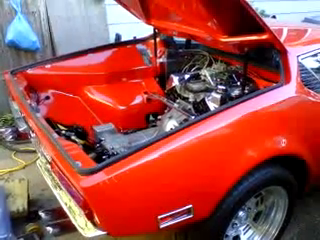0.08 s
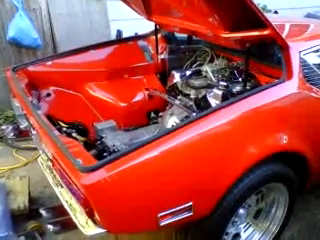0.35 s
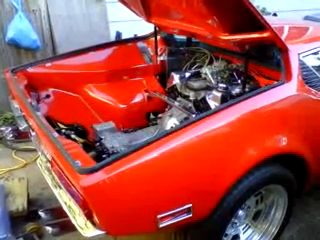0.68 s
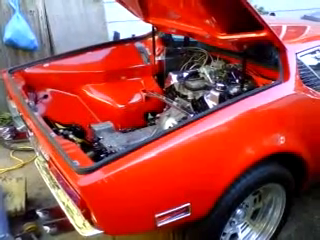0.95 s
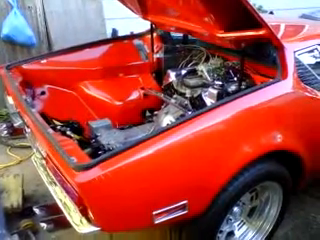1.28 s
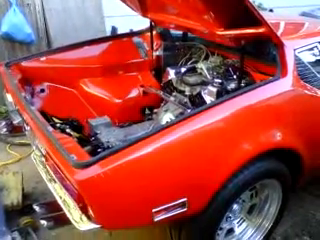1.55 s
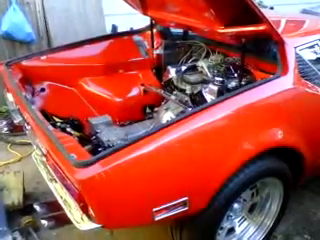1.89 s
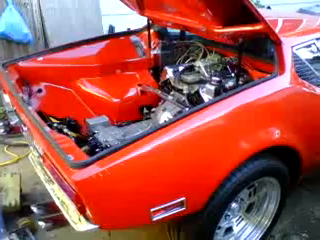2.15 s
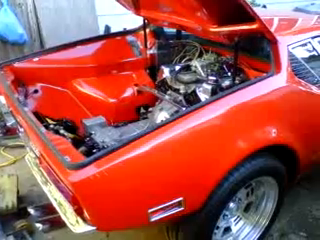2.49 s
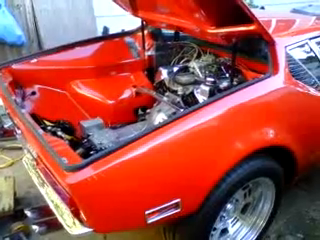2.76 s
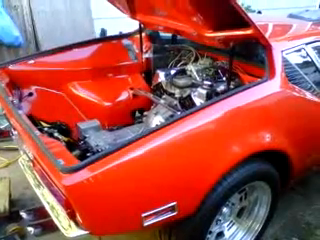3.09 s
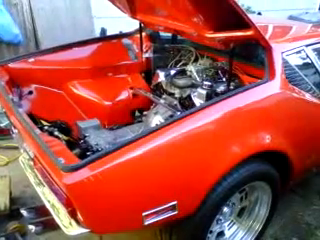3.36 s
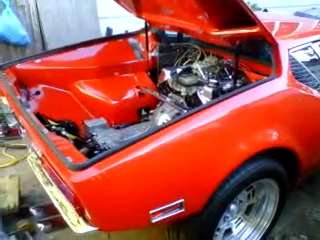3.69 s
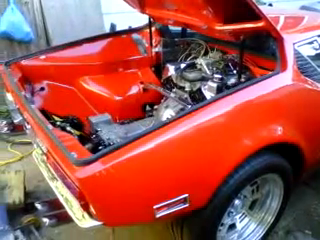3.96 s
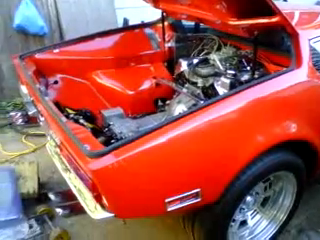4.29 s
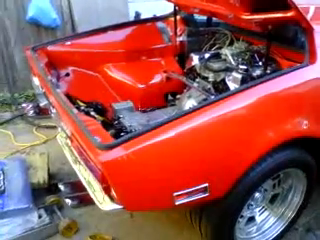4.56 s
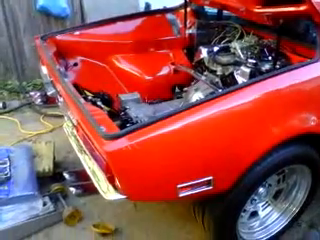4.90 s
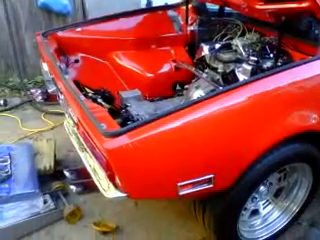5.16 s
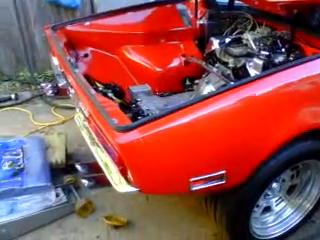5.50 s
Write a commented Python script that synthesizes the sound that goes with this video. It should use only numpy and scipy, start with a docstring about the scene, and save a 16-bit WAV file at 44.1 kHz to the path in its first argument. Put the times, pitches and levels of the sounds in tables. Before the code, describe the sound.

A low outdoor rumble swells and fades, with a few faint rubs. A little past halfway, a sports car's starter engages with a clack and grinds briefly with a dipping whine. The big engine catches, flares once and settles into a loud, loping idle. The microphone is close to the open engine bay and overloads on the deep exhaust.

```python
"""V8 cold-open start in a yard

A sports car, bonnet open, close to a small microphone. Over a low outdoor rumble the solenoid slams the pinion
in and the starter gears grind through three compressions. The engine catches, flares and settles to a loping
idle: each firing sends a thump and a bark down the exhaust, one bank lagging the other. The exhaust overloads
the microphone."""
import sys
import numpy as np
from scipy import signal
from scipy.fft import rfft, irfft, next_fast_len
from scipy.io import wavfile

SR = 44100
rng = np.random.default_rng(int(sys.argv[2]) if len(sys.argv) > 2 else 0)


def to_wav(s):
    """Save 16-bit WAV."""
    ch = np.atleast_2d(s).T  # columns
    pcm = np.round(np.clip(ch, -1, 1) * 32767)  # PCM
    wavfile.write(sys.argv[1], SR, pcm.astype(np.int16))


N = 248283
TIME_S = np.arange(N) / SR

# Cylinders in firing order: bank (0 near, 1 far), thump/dB, bark/dB
CYLINDERS = [(0, -0.5, 6), (0, -3.5, 5), (1, 0, -3), (0, 0, 4.5), (1, 0, -6), (1, -1.3, -4), (0, 0, 3.5),
             (1, -2, -2.5)]
# Exhaust response to the thumps: f/Hz, level/dB
THUMP_SPECTRUM = [(15, -29.5), (35, -3.5), (62, 2.5), (92, 2), (130, 7.5), (200, -6), (350, -3.5),
                  (700, -46.5)]
# Exhaust response to the barks: f/Hz, level/dB
BARK_SPECTRUM = [(70, -5.5), (125, 11), (180, 7), (260, 4), (365, -1), (480, -6.5), (660, -12),
                 (900, -27.5), (1400, -18.5), (2500, -36), (7000, -52.5)]
# Exhaust pipe resonances: f/Hz, bandwidth/Hz, level/dB
PIPE_MODES = [(361, 24, 3), (474, 24.4, 2.5), (638, 73, 0.5), (869, 50, -15)]
# Bark dips and surges in catch and flare: t/s, gain/dB, half-width/s
BARK_SURGES = [(4.009, -7, 0.023), (4.057, -7, 0.011), (4.105, 3.5, 0.053), (4.224, 3, 0.024),
               (4.42, 4, 0.027)]
# Intake air and valve gear: f/Hz, level/dB
BAY_SPECTRUM = [(700, -34), (1600, 14), (2800, 9.5), (3700, -11), (4700, 8), (6000, -0.5), (7300, -25)]
# Compressions dragging the starter: t/s, share of speed lost
COMPRESSIONS = [(3.447, .23), (3.675, 0.32), (3.915, 0.2)]
# Starter whine: multiple of pinion rate, level/dB, gain under strain/dB
GEAR_TONES = [(8, -13.5, 4), (9, -7.5, 2), (10, -17, 6), (17, -17.5, -1.5), (18, -12.5, 12)]
# Bell housing response: f/Hz, level/dB
HOUSING_SPECTRUM = [(71, -58.5), (120, -16.5), (208, -5.5), (288, -14.5), (451, -7), (526, -10.5), (837, 1),
                    (1400, -6.5), (1750, -3), (3200, -6.5), (3930, -16), (5840, -16), (7300, -39),
                    (9490, -74), (16100, -120)]
# Bell housing resonances: f/Hz, bandwidth/Hz, level/dB
HOUSING_MODES = [(464, 29, -6.5), (869, 14, -7.5), (986, 21, -7), (1290, 15, -0.5), (1730, 91, -5.5),
                 (1734, 44, -3), (2170, 40, 0.5), (2380, 30, -8), (2716, 77, -6), (3134, 37, -10)]
# Solenoid and pinion blows: t/s, level/dB, T60/s
BLOWS = [(3.333, -29.5, 0.12), (3.353, -14.5, 0.065), (3.377, -22.5, 0.06)]
# Clack of a blow: f/Hz, level/dB
CLACK_SPECTRUM = [(100, -22), (220, -1), (470, -16), (680, -11.5), (1280, 1), (1700, -3.5), (2150, -1),
                  (2900, 5.5), (3550, -7.5), (6500, -15), (7400, -33.5)]
# Free-spinning starter: f/Hz, level/dB
FREEWHEEL_SPECTRUM = [(700, -15), (1600, 4.5), (2800, 3.5), (3700, -7), (4700, 0), (6000, -1),
                      (7300, -15.5)]
# Pinion leaving the flywheel: t/s, level/dB, half-width/s
RASPS = [(4.48, -27.5, 0.052), (4.545, -32.5, 0.0061)]
# Air puffs while cranking: t/s, level/dB, half-width/s
CHUFFS = [(3.397, -31, .018), (3.47, -31.5, 0.063), (3.623, -28, .02)]
# Air puff: f/Hz, level/dB
CHUFF_SPECTRUM = [(35, -2), (90, -11), (140, -7.5), (215, 0.5), (300, -6), (440, 4), (700, -36.5)]
# Soft rubs: t/s, level/dB, half-width/s, f/Hz, glide/(Hz/s), bandwidth/Hz
SCUFFS = [(0.034, -47, 0.029, 943, 0, 262), (0.356, -48.5, 0.037, 925, 6002, 200),
          (0.358, -44.5, 0.053, 458, -1, 160), (0.499, -48, 0.091, 607, -3000, 480),
          (1.108, -53.5, 0.042, 1093, -7, 636), (1.493, -59.5, 0.064, 1320, 0, 264)]
# Outdoor swells: peak t/s, rumble/dB, rush/dB, time constant/s
SWELLS = [(0.022, -48.5, -49, 0.24), (0.28, -45.5, -49, 0.24), (0.799, -40.5, -58, 0.49),
          (1.173, -28.5, -51, 0.17), (1.541, -38.5, -53.5, 0.18), (3.4, -40, -46.5, 0.87)]
# Low outdoor rumble: f/Hz, level/dB
RUMBLE_SPECTRUM = [(24, -40), (40, -3), (91, -7), (172, 0.5), (309, -9.5), (362, -4.5), (440, -9),
                   (475, -15.5), (650, -16), (694, -25.5), (900, -50), (1170, -68), (1980, -120)]
# Midrange rush: f/Hz, level/dB
RUSH_SPECTRUM = [(250, -25.5), (420, 9.5), (620, 6), (780, -3), (950, 1.5), (1130, -0.5), (1380, -2),
                 (1650, -7.5), (2000, -38.5)]
# High hiss: f/Hz, level/dB
HISS_SPECTRUM = [(1100, -2), (1700, -6), (2300, -2.5), (2900, -6), (3500, -22), (4300, -17), (7000, -26.5)]
# Steady noise floor: f/Hz, level/dB
FLOOR_SPECTRUM = [(15, -11.5), (50, -1), (90, -5.5), (250, -15), (900, -27.5), (2500, -40.5), (7000, -48.5)]


def engine(bark_db=-3.5, pipe_db=-4, bay_db=-34, flicker_db=6, clatter=0.47, bark_slope=2.14):
    """Firing pulses boom and rasp through the exhaust; intake and valve gear clatter in step."""
    firing_hz, effort_db = combustion()
    thumps, barks, puffs = cylinder_pulses(firing_hz)
    running = TIME_S > 4
    thumps = coloured(thumps, THUMP_SPECTRUM)
    boom = amp(effort_db) * thumps / thumps[running].std()
    barks = unit_rms(coloured(barks, BARK_SPECTRUM)) + amp(pipe_db) * ring(barks, PIPE_MODES)
    surge_db = sum(db * hump(at_s, width_s) for at_s, db, width_s in BARK_SURGES)
    rasp_db = bark_db + bark_slope * effort_db + surge_db  # harder firing is brighter
    rasp = amp(rasp_db) * barks / barks[running].std()
    beat = 1 + clatter * (np.sqrt(puffs / puffs[running].mean()) - 1)
    bay = amp(bay_db + flicker_db * wander(48)) * beat * noise(BAY_SPECTRUM)
    return (boom + rasp + bay) * gate(3.9, np.inf, 0.012)


def combustion(first_hz=38.27, idle_hz=66.04, flare_hz=13, hunt_hz=0.96, hunt_period_s=1.1,
               catch_s=3.996, catch_db_per_s=636):
    """Firing rate/Hz and effort/dB: catch, quick run-up, one flare, gently hunting idle."""
    dip_hz = hunt_hz * np.cos(2 * np.pi * (TIME_S - 5.02) / hunt_period_s)
    running_hz = idle_hz - dip_hz + flare_hz * hump(4.3, 0.2)
    firing_hz = first_hz + (running_hz - first_hz) * step(4.06, 0.015)
    running_db = -3 + 4.5 * hump(4.1, 0.23)
    return firing_hz, running_db - catch_db_per_s * np.clip(catch_s - TIME_S, 0, 0.5)


def cylinder_pulses(firing_hz, cycle_start_s=5.0505, spread_db=0.5, turbulence=0.81,
                    lag_firings=0.25, stumble_firings=0.022, rise_firings=0.29, decay_firings=0.7):
    """Thumps, barks and bark envelope of all firings; the far bank's lag makes the lope."""
    firings = np.cumsum(firing_hz) / SR
    firings -= np.interp(cycle_start_s, TIME_S, firings)
    voices = rng.standard_normal((len(CYLINDERS), SR // 10))  # each port repeats its own bark
    lope = 1 + 0.36 * hump(4.64, 0.13)  # deepens as the speed falls back
    thumps, barks, puffs = np.zeros((3, N))
    for k in range(int(np.interp(3.93, TIME_S, firings)), int(firings[-1]) + 2):
        cylinder = k % len(CYLINDERS)
        bank, thump_db, bark_db = CYLINDERS[cylinder]
        span = slice(*np.searchsorted(firings, [k - 1, k + 3]))
        lag = lag_firings * (bank - 0.5) * lope[span]
        age = firings[span] - k - lag - stumble_firings * rng.standard_normal()
        chance_db = spread_db * rng.standard_normal()
        swirl = turbulence * rng.standard_normal(SR // 10)
        window = np.cos(np.pi / 2 * np.clip(age - 0.5, -1, 1)) ** 2
        thumps[span] += amp(thump_db + chance_db) * window * np.cos(2 * np.pi * age)
        attack = np.clip((age - 0.1) / rise_firings, 0, 1)
        puff = amp(bark_db + chance_db) * attack * np.exp(-abs(age) / decay_firings)
        barks[span] += puff * np.resize(voices[cylinder] + swirl, len(age))
        puffs[span] += puff
    return thumps, barks, puffs


def starter(scrape_db=-1, buzz_db=-6, ring_db=-4, rough_db=1, flutter_db=3, bite=0.54, jitter=0.012,
            pinion_teeth=9, strain_lead_s=0.062):
    """Gear teeth scrape, buzz and whine in the bell housing, straining into a compression."""
    mesh_hz, gears_db = cranking()
    teeth = np.cumsum(mesh_hz * (1 + jitter * wander(92))) / SR
    pinion_rad = 2 * np.pi * teeth / pinion_teeth
    force = unit_rms(amp(rough_db * rng.standard_normal(N)[teeth.astype(int)]))  # one draw per tooth
    scrape = force * (1 + bite * np.cos(2 * np.pi * teeth)) * rng.standard_normal(N)
    wear = sum(np.sin(order * pinion_rad + 2 * np.pi * rng.random()) for order in range(5, 37))
    grind = amp(scrape_db) * unit_rms(coloured(scrape, HOUSING_SPECTRUM))
    grind += amp(buzz_db) * unit_rms(coloured(force * wear, HOUSING_SPECTRUM))
    grind += amp(ring_db) * ring(scrape, HOUSING_MODES)
    strain = sum(hump(at_s - strain_lead_s, 0.045) for at_s, _ in COMPRESSIONS[1:])
    whine = sum(amp(db + strain_db * strain + flutter_db * wander(35)) * np.sin(order * pinion_rad)
                for order, db, strain_db in GEAR_TONES)
    whine *= np.sqrt(2) * gate(3.385, 3.895, 0.014)
    engaged = gate(3.43, np.inf, 0.08) * gate(0, 3.95, 0.14)
    return amp(gears_db) * (grind + whine) * engaged


def cranking(start_s=3.39, unload_s=3.821, base_hz=862, climb_hz_per_s=230, unload_db_per_s=75):
    """Mesh rate/Hz and gear level/dB: both sag in compressions; the level falls as the gears unload."""
    drag = sum(share * hump(at_s, 0.066) for at_s, share in COMPRESSIONS)
    free_hz = base_hz + climb_hz_per_s * (np.clip(TIME_S, start_s, unload_s) - start_s)
    gears_db = -21 - 13 * drag - unload_db_per_s * np.maximum(TIME_S - unload_s, 0)
    return free_hz * (1 - drag), gears_db


def solenoid(clack_db=-1, ring_db=-4, rise_s=0.0055, hold_s=0.012):
    """The pinion is thrown into the flywheel: noisy clacks ring the steel."""
    steel = amp(clack_db) * noise(CLACK_SPECTRUM)
    steel += amp(ring_db) * ring(rng.standard_normal(N), HOUSING_MODES)
    envelope = np.zeros(N)
    for at_s, db, t60_s in BLOWS:
        decay_db = 60 * np.maximum(TIME_S - at_s - hold_s, 0) / t60_s
        envelope += amp(db - decay_db) * gate(at_s + rise_s / 2, np.inf, rise_s)
    return steel * envelope


def freewheel(spin_db=-21, flicker_db=2.5, start_s=3.918, key_off_s=4.25):
    """The starter whirrs freely until the key is let go; its pinion rasps out of the flywheel."""
    spin = amp(spin_db) * step(start_s, 0.026) * gate(0, key_off_s, 0.61)
    return (spin + bursts(RASPS)) * amp(flicker_db * wander(60)) * noise(FREEWHEEL_SPECTRUM)


def chuffs():
    """Unburnt air leaves the cylinders in soft, low puffs."""
    return noise(CHUFF_SPECTRUM) * bursts(CHUFFS)


def scuffs():
    """Brief rubs: narrow noise bands swell, glide and fade."""
    rubs = np.zeros(N)
    for at_s, db, width_s, hz, glide_hz_per_s, band_hz in SCUFFS:
        age_s = TIME_S - at_s
        carrier = np.sqrt(2) * np.cos(2 * np.pi * (hz + glide_hz_per_s * age_s / 2) * age_s)
        rubs += amp(db) * hump(at_s, width_s) * wander(band_hz / 2) * carrier
    return rubs


def tick(at_s=0.3375, level_db=-44, t60_s=0.0028):
    """One tiny dry tick."""
    age_s = np.maximum(TIME_S - at_s, 0)
    return (age_s > 0) * amp(level_db - 60 * age_s / t60_s) * rng.standard_normal(N)


def outdoors(gust_db=2, rush_gain_db=2, hiss_start_db=-83.5, hiss_rise_db=33, floor_db=-47.5):
    """Rumble and rush swell and pass over a steady floor; a hiss rises once and stays."""
    rumble_power, rush_power = np.zeros((2, N))
    for at_s, rumble_db, rush_db, tau_s in SWELLS:
        swell = np.exp(-abs(TIME_S - at_s) / tau_s)
        rumble_power += (amp(rumble_db) * swell) ** 2
        rush_power += (amp(rush_db) * swell) ** 2
    rumble = np.sqrt(rumble_power) * amp(gust_db * wander(25)) * noise(RUMBLE_SPECTRUM)
    rush = np.sqrt(rush_power) * amp(rush_gain_db) * noise(RUSH_SPECTRUM)
    hiss = amp(hiss_start_db + hiss_rise_db * step(1.725, 0.3)) * noise(HISS_SPECTRUM)
    return rumble + rush + hiss + amp(floor_db) * noise(FLOOR_SPECTRUM)


def amp(db):
    """Decibels to gain."""
    return 10 ** (np.asarray(db) / 20)


def unit_rms(x):
    """Scale to rms 1."""
    return x / np.sqrt(np.mean(x ** 2) + 1e-20)


def coloured(x, spectrum):
    """Filter by (f/Hz, level/dB) points, interpolated in log frequency."""
    points_hz, points_db = np.transpose(spectrum)
    size = next_fast_len(len(x) + 4096)
    hz = np.fft.rfftfreq(size, 1 / SR)
    gain = amp(np.interp(np.log(hz + 1), np.log(points_hz), points_db))
    return irfft(rfft(x, size) * gain, size)[:len(x)]


def ring(x, modes):
    """Resonances driven by x, rms 1."""
    return unit_rms(sum(amp(db) * signal.lfilter(*signal.iirpeak(hz, hz / band_hz, fs=SR), x)
                        for hz, band_hz, db in modes))


def noise(spectrum):
    """Shaped noise, rms 1."""
    return unit_rms(coloured(rng.standard_normal(N), spectrum))


def wander(cutoff_hz):
    """Low-passed random drift, rms 1."""
    size = next_fast_len(N, True)
    hz = np.fft.rfftfreq(size, 1 / SR)
    return unit_rms(irfft(rfft(rng.standard_normal(N), size) / (1 + (hz / cutoff_hz) ** 4), size)[:N])


def gate(start_s, end_s, fade_s):
    """1 from start to end, linear fades outside."""
    return np.clip(np.minimum(TIME_S - start_s, end_s - TIME_S) / fade_s + 1, 0, 1)


def step(at_s, tau_s):
    """Smooth rise from 0 to 1."""
    return 0.5 + 0.5 * np.tanh(0.5 * (TIME_S - at_s) / tau_s)


def hump(at_s, half_width_s):
    """Gaussian bell, height 1."""
    return np.exp(-((TIME_S - at_s) / half_width_s) ** 2)


def bursts(events):
    """Envelope of bells from (t/s, level/dB, half-width/s) rows."""
    return sum(amp(db) * hump(at_s, width_s) for at_s, db, width_s in events)


def scene():
    """Mono sum at the microphone."""
    background = outdoors() + scuffs() + tick()
    return (background + solenoid() + starter() + chuffs() + freewheel() + engine())[None]


def record(dry, overload=0.48, treble_hz=2400, mids_hz=680, case_hz=650, case_db=-13, case_t60_s=0.14,
           fast_s=0.0029, slow_s=1.09, cutoff_hz=7400):
    """The microphone overloads, its case rings briefly; fast and slow gain control lower the level."""
    drive = dry[0] / overload
    clipped = drive / (1 + drive ** 6) ** (1 / 6) + 0.025 * drive
    # Much of the treble and a little of the bark ride through the overload.
    treble_sos = signal.butter(2, treble_hz, "high", fs=SR, output="sos")
    clipped += 0.58 * signal.sosfiltfilt(treble_sos, drive - clipped)
    clipped += 0.16 * signal.lfilter(*signal.iirpeak(mids_hz, 1.5, fs=SR), drive - clipped)
    age_s = np.arange(SR // 25) / SR
    case_ir = rng.standard_normal(len(age_s)) * amp(-60 * age_s / case_t60_s)
    case_drive = signal.sosfilt(signal.butter(2, case_hz, "high", fs=SR, output="sos"), clipped)
    mic = clipped + amp(case_db) * signal.oaconvolve(case_drive, case_ir / np.linalg.norm(case_ir))[:N]
    fast_power, slow_power = (signal.lfilter([1 / (tau_s * SR)], [1, 1 / (tau_s * SR) - 1], mic ** 2)
                              for tau_s in (fast_s, slow_s))
    levelled = overload * mic / (1 + 0.99 * fast_power + 3.2 * slow_power)
    lowpass = signal.firwin(401, cutoff_hz, window=("kaiser", 9), fs=SR)
    return signal.oaconvolve(levelled, lowpass, "same")[None]


dry = scene()
out = record(dry)
to_wav(out)
```